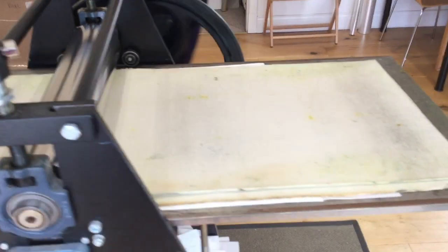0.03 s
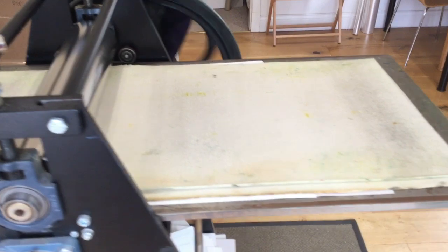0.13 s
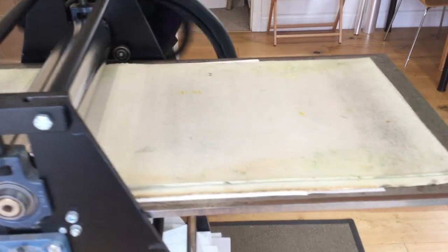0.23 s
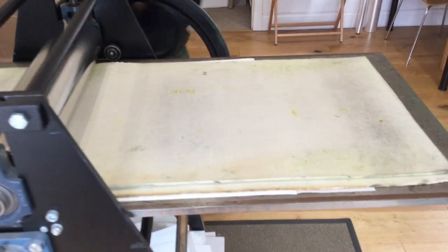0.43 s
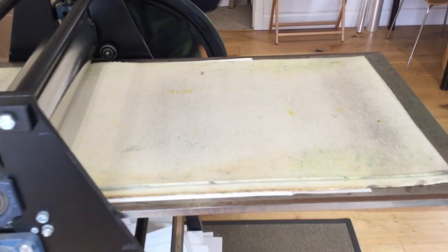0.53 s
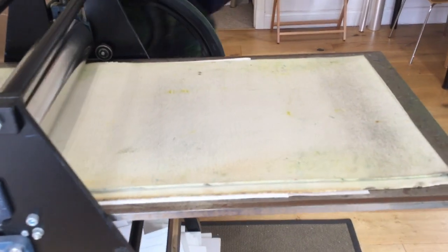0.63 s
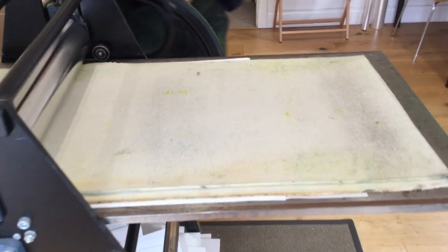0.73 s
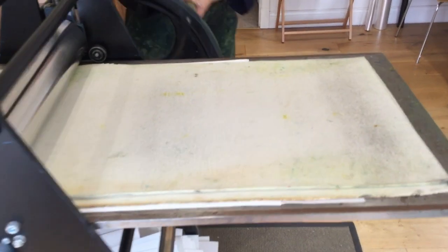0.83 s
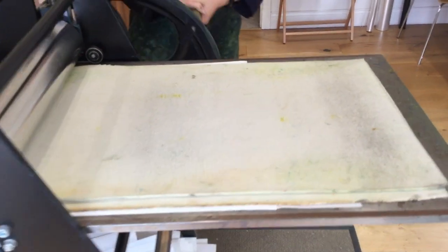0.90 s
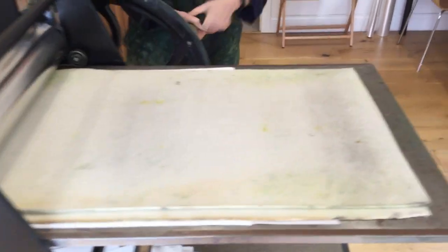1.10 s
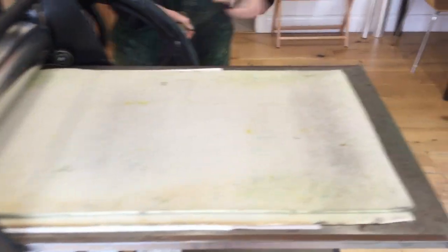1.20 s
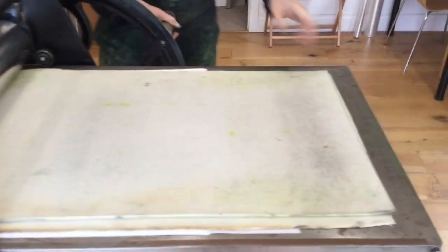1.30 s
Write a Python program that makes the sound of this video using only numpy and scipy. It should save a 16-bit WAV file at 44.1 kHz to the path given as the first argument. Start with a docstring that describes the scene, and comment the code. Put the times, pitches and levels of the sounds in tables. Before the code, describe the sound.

A heavy hand-turned press thunks once: its steel frame clanks and rings faintly as the sliding bed thumps. The bed rolls on with a soft low rumble, then something small taps in the quiet studio.

```python
"""A hand-turned etching press works in a quiet studio with a wooden floor. Its heavy bed, the sliding
table, rumbles under the roller. The roller drops off the edge of the plate: the steel frame clanks and
rings faintly, and just after that the bed thumps and shakes the floor. The bed rolls on softly,
and something small taps once."""
import sys
import numpy as np
from scipy import signal
from scipy.fft import rfft, irfft, next_fast_len
from scipy.io import wavfile
from scipy.ndimage import map_coordinates

SR = 44100
rng = np.random.default_rng(int(sys.argv[2]) if len(sys.argv) > 2 else 0)


def dump_mix(stems):
    """Bounce the given channels to the path in sys.argv[1] as a 16-bit WAV at rate SR."""
    frames = np.atleast_2d(stems).T  # one column per channel
    limited = np.clip(frames, -1, 1)  # hard clip at full scale
    pcm = np.round(limited * 32767).astype(np.int16)
    wavfile.write(sys.argv[1], SR, pcm)


N = 59535


def amp(db):
    """Turn decibels into a volume multiplier."""
    return 10 ** (np.asarray(db) / 20)


def unit(x):
    """Scale a sound to an average strength (rms) of 1."""
    return x / np.sqrt(np.mean(x ** 2) + 1e-20)


def along(points, hz):
    """Read a table between its frequencies, giving each octave about equal room."""
    freqs, values = np.transpose(points)
    return np.interp(np.log(hz + 1), np.log(freqs + 1), values)


def clock():
    """The time of every sample, in seconds."""
    return np.arange(N) / SR


def curves(rows):
    """Join a table's points in time with straight lines, one curve per level column."""
    times, *columns = np.transpose(rows)
    return [np.interp(clock(), times, column) for column in columns]


def wobble(rate):
    """A smooth random curve that meets `rate` new values a second."""
    return map_coordinates(rng.standard_normal(256), [clock() * rate], mode="wrap")


def filtered(x, response):
    """Turn each frequency up or down by response(hz)."""
    size = next_fast_len(N + SR // 2)
    return irfft(rfft(x, size) * response(np.fft.rfftfreq(size, 1 / SR)), size)[:N]


def noise(colour):
    """Noise of strength 1; a colour table says how strong its frequencies are next to each other."""
    return unit(filtered(rng.standard_normal(N), lambda hz: amp(along(colour, hz))))


def fade(t, t60):
    """Die away by 60 dB every t60 seconds, the fade time."""
    return np.exp(-np.log(1000) * t / t60)


def rise(attack_s):
    """Swell smoothly from silence."""
    return 1 - np.exp(-clock() / attack_s)


def at(start_s, x):
    """Delay a sound so that it begins at start_s."""
    return np.pad(x, (max(round(start_s * SR), 0), 0))[:N]


def burst(colour, t60, attack_s):
    """Noise that starts and dies away."""
    return noise(colour) * fade(clock(), t60) * rise(attack_s)


def ring(tones, scatter_db, blur, blur_rate):
    """The fading tones of a struck object; the room makes each one waver."""
    t = clock()
    out = np.zeros(N)
    for hz, db, t60 in tones:
        loudness = amp(db + scatter_db * rng.standard_normal()) * fade(t, t60)
        drift = wobble(blur_rate) + 1j * wobble(blur_rate)  # shifts both level and timing of the wave
        waver = (1 + blur * drift) / np.sqrt(1 + 2 * blur ** 2)
        out += loudness * np.imag(np.exp(2j * np.pi * hz * t) * waver)
    return out


# How loud the rolling bed is: t/s, drone level/dB, grinding level/dB
ROLL_LEVELS = [(0, -50, -48), (.04, -56.5, -51.5), (.10, -53, -50), (.185, -43.5, -55), (.21, -54.5, -47.5),
               (.6, -56.5, -53), (.85, -70, -62.5), (.925, -84, -67), (.95, -48.5, -61), (.99, -58.5, -63),
               (1.045, -75.5, -69), (1.12, -59.5, -76), (1.22, -92, -90), (1.32, -77, -97),
               (1.35, -54, -70)]
# Colour of the grinding: f/Hz, level/dB
GRIND_COLOUR = [(15, -72), (25, -32), (63, -2), (114, -5.5), (242, -11.5), (401, -12.5), (516, -24),
                (779, -25), (915, -36.5), (1320, -33.5), (6000, -55.5), (7800, -96), (13200, -120)]
# A soft rustle as the bed runs out: t/s, level/dB
RUSTLE_LEVELS = [(.9, -89), (.98, -72.5), (1.06, -72.5), (1.18, -83), (1.3, -87.5), (1.35, -74)]
# Colour of the rustle: f/Hz, level/dB
RUSTLE_COLOUR = [(400, -20), (1200, 1.5), (2500, -6), (5000, -12), (10000, -24), (14000, -23.5)]


def rolling_bed(start_hz=115.8, sag_hz_per_s=12, rough_db=1.5):
    """The moving bed grinds, rustles and makes an uneven drone that slowly sinks in pitch."""
    drone_db, grind_db = curves(ROLL_LEVELS)
    rustle_db, = curves(RUSTLE_LEVELS)
    pitch_hz = (start_hz - sag_hz_per_s * clock()) * (1 + .035 * wobble(35.57))
    phase = 2 * np.pi * np.cumsum(pitch_hz) / SR
    drone = unit(np.sin(phase) * amp(rough_db * wobble(39.6)))
    grind = amp(grind_db) * noise(GRIND_COLOUR)
    rustle = amp(rustle_db) * noise(RUSTLE_COLOUR)
    return amp(drone_db) * drone + grind + rustle


# Colour of the quiet room: f/Hz, level/dB
AIR_COLOUR = [(25, -3.5), (80, 5), (300, -4.5), (700, -19), (2000, -19), (5000, -32), (12500, -29.5),
              (15000, -41.5)]


def studio_air():
    """The still air of the studio is a faint, steady, low hush."""
    return amp(-69.5) * noise(AIR_COLOUR)


# Colour of the frame's clang: f/Hz, level/dB
CLANG_COLOUR = [(60, -37.5), (170, -6.5), (300, 3.5), (420, -5), (700, 0), (830, -2), (930, -7), (1400, -5),
                (1780, -5.5), (2100, -5.5), (2370, -5), (2560, -14), (2980, -3.5), (3500, -17), (4250, -15),
                (4900, -29.5), (5400, -18.5), (6100, -22), (7250, -33), (8400, -34), (10000, -45.5),
                (14000, -45)]
# How long the clang lasts: f/Hz, fade time/s
CLANG_FADES = [(100, 2), (280, 0.99), (550, .72), (2000, 0.8), (4000, 0.6), (9000, 0.8)]


def frame_clang(patch_db=1.5, patch_hz=45):
    """Countless close tones of uneven strength blur into noise; each band fades at its own speed."""
    patches = rng.standard_normal(size=1024)
    uneven = lambda hz: amp(patch_db * map_coordinates(patches, [hz / patch_hz], mode="wrap"))
    steady = unit(filtered(noise(CLANG_COLOUR), uneven))
    hz, t, bands = signal.stft(steady, SR, nperseg=512)
    fading = bands * fade(t, along(CLANG_FADES, hz)[:, None])
    return signal.istft(fading, SR, nperseg=512)[1][:N]


# Blows on the frame: t/s, level/dB, treble cutoff f/Hz
FRAME_BLOWS = [(.2160, -34.5, 12000), (.229, -40, 644), (.2845, -39.5, 2000), (.331, -37.5, 351)]
# Colour of the hard contact: f/Hz, level/dB
CONTACT_COLOUR = [(150, -29), (550, 5), (900, -3.5), (1100, 5.5), (1700, 3.5), (2300, 7), (2600, -13),
                  (3000, 0.5), (3600, -22), (6000, -17), (9000, -24.5), (14000, -68)]
# Clear tones of the steel: f/Hz, level/dB, fade time/s
STEEL_TONES = [(299, -4, 1.05), (423, -9, .8), (487, -9, .75), (517, -7, .6), (555, -12, 1.2),
               (582, -6, .6), (659, -9, 1.05), (694, -4, .7), (791, -7, .7), (829, -6, .55), (1066, -9, .5),
               (1478, -9, .6), (1670, -23, 1.4), (1972, -11, .55), (2038, -12, .75), (2086, -8, .7),
               (2105, -8, .75), (2304, -7, .5), (2334, -9, .5), (2840, -16, .5), (3053, -15, .45),
               (4037, -20, .66), (4265, -14.5, .38), (5148, -23, .38), (5249, -17, .38), (6298, -17.5, .54),
               (6322, -22, .45), (7716, -24, .42), (7729, -20, .52), (9133, -36, .3)]


def frame_clanks():
    """The roller drops and the frame clanks. The first blow rings the steel; later ones are duller."""
    out = np.zeros(N)
    for start_s, db, cutoff_hz in FRAME_BLOWS:
        contact = amp(4.5) * burst(CONTACT_COLOUR, t60=0.071, attack_s=0.00074)
        clang = amp(-1) * frame_clang() * rise(attack_s=0.001)
        treble_cut = signal.butter(2, cutoff_hz, fs=SR, output="sos")
        out += at(start_s, amp(db) * signal.sosfilt(treble_cut, contact + clang))
    first_s, first_db, _ = FRAME_BLOWS[0]
    steel = ring(STEEL_TONES, scatter_db=0.16, blur=0.55, blur_rate=35.15) * rise(attack_s=0.0038)
    return out + at(first_s, amp(first_db - 1) * steel)


# Jolts of the bed: t/s, level/dB, pitch multiplier, length multiplier
BED_JOLTS = [(0.254, -11, 0.97, 1), (.3585, -18, .8, 0.71)]
# Low tones of the bed on its stand: f/Hz, level/dB, fade time/s
BED_TONES = [(72.5, -21, .48), (82.5, -11, .36), (107, 0, .14), (127.5, -1.5, .21)]
# Colour of the floor's boom: f/Hz, level/dB
FLOOR_COLOUR = [(25, -51), (50, -23), (80, -6), (125, 3), (165, -11), (220, -4.5), (270, -2), (325, -1.5),
                (480, -25), (800, -47), (2000, -120)]


def bed_thumps():
    """The heavy bed drops, swings and shakes the floor, then settles with a lower, shorter thud."""
    out = np.zeros(N)
    for start_s, db, pitch, length in BED_JOLTS:
        tones = [(hz * pitch, level, t60 * length) for hz, level, t60 in BED_TONES]
        swing = ring(tones, scatter_db=.3, blur=0.03, blur_rate=32) * rise(attack_s=0.026 * length)
        floor = amp(-27.5) * length * burst(FLOOR_COLOUR, t60=1, attack_s=0.011)
        out += at(start_s, amp(db) * (floor - swing))
    return out


# Colour of the tap's sharp tick: f/Hz, level/dB
TICK_COLOUR = [(60, -10), (150, 13.5), (500, -4), (900, -11), (1500, -12), (2400, 4.5), (3000, -4.5),
               (3900, 4), (4900, -5), (6200, -22), (8500, -25), (11300, -25.5), (15000, -36)]


def tick(size=2048):
    """The instant of the tap: one sharp pulse with a peak of 1."""
    gains = amp(along(TICK_COLOUR, np.fft.rfftfreq(size, 1 / SR)))
    # Folding the late half onto the early half keeps the colour and packs the sound at the start.
    folded = irfft(np.log(gains))
    folded[1:size // 2] *= 2
    folded[size // 2 + 1:] = 0
    pulse = irfft(np.exp(rfft(folded)))
    return np.pad(pulse / np.abs(pulse).max(), (0, N - size))


# Colour of the dull knock under the tick: f/Hz, level/dB
KNOCK_COLOUR = [(35, -25), (60, 2), (110, 1), (170, 0.5), (260, 0.5), (500, -15.5), (1200, -32),
                (3000, -120)]
# Colour of the tap's echoes: f/Hz, level/dB
ECHO_COLOUR = [(600, -5.5), (1800, -7), (2800, 2), (4400, -0.5), (6200, -17), (12000, -27.5)]


def small_tap(start_s=1.071, wall_delay_s=0.024):
    """Something small taps with a tick and a dull knock; the room echoes it, and then a wall does."""
    knock = amp(-57) * burst(KNOCK_COLOUR, t60=0.51, attack_s=0.0033)
    room = amp(-64) * burst(ECHO_COLOUR, t60=0.47, attack_s=0.0009)
    wall = amp(-65) * burst(ECHO_COLOUR, t60=0.47, attack_s=0.0051)
    return at(start_s, amp(-36) * tick() + knock + room + at(wall_delay_s, wall))


def scene():
    """The press, the tap and the studio air, added into one channel."""
    press = frame_clanks() + bed_thumps() + rolling_bed()
    return (press + small_tap() + studio_air())[None]


def record(dry, low_cut_hz=55, top_hz=15100):
    """The microphone weakens the deepest bass and keeps nothing above top_hz."""
    bass_cut = signal.butter(2, low_cut_hz, "high", fs=SR, output="sos")
    thinned = signal.sosfilt(bass_cut, dry)
    return np.array([filtered(channel, lambda hz: hz < top_hz) for channel in thinned])


dry = scene()
out = record(dry)
dump_mix(out)
```